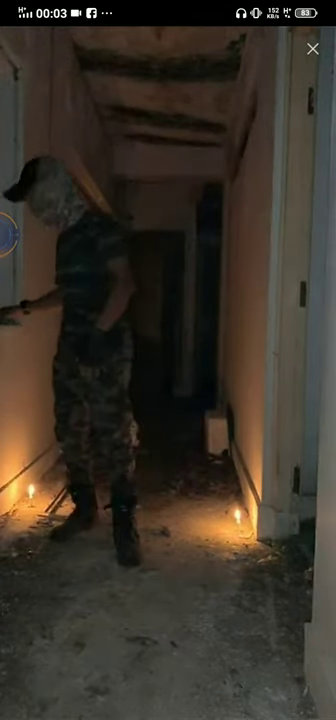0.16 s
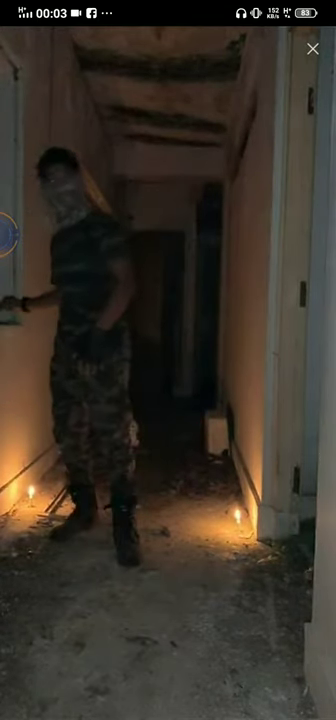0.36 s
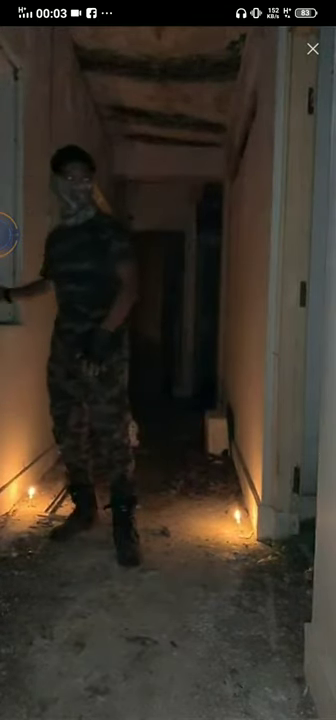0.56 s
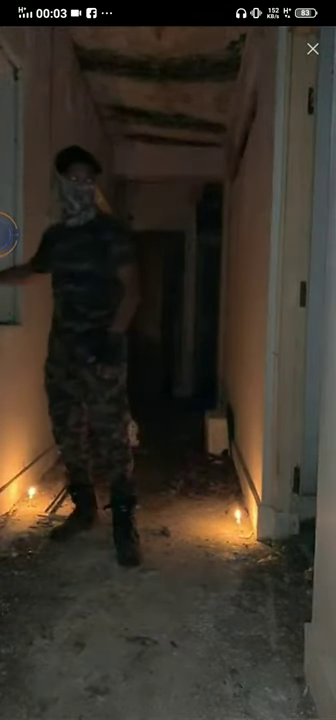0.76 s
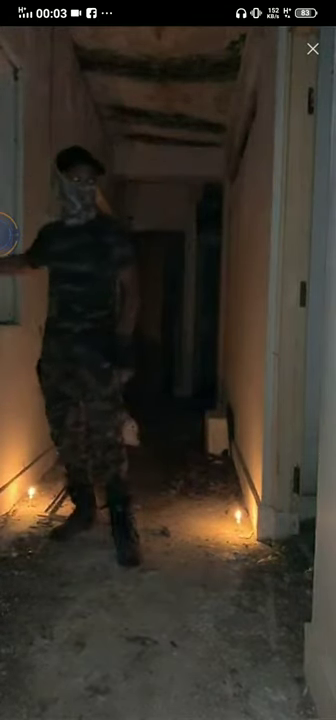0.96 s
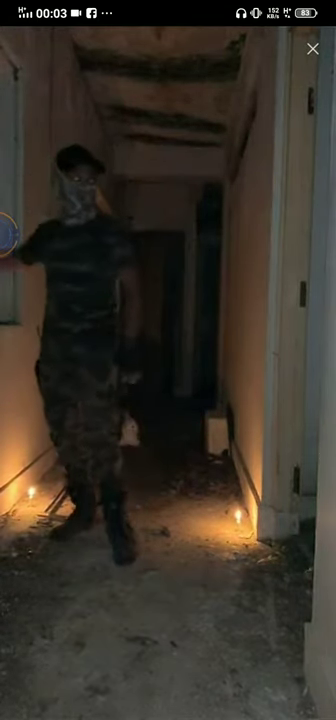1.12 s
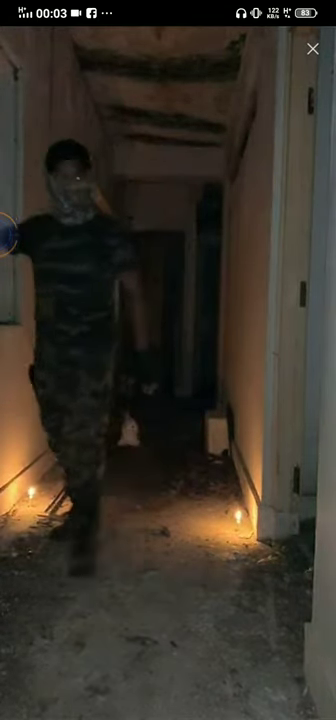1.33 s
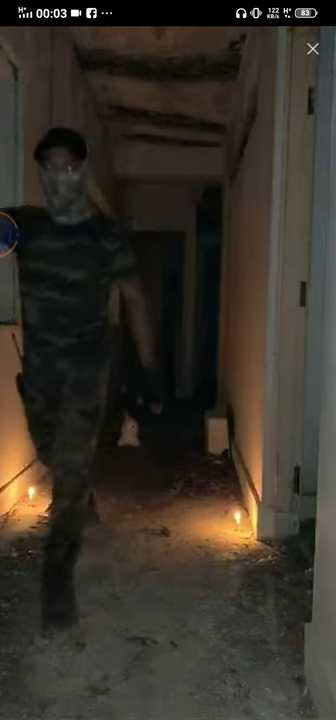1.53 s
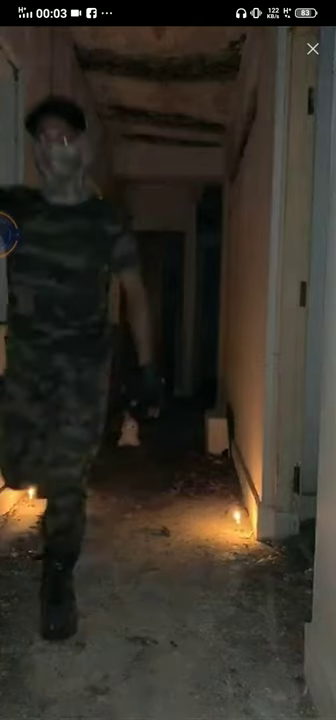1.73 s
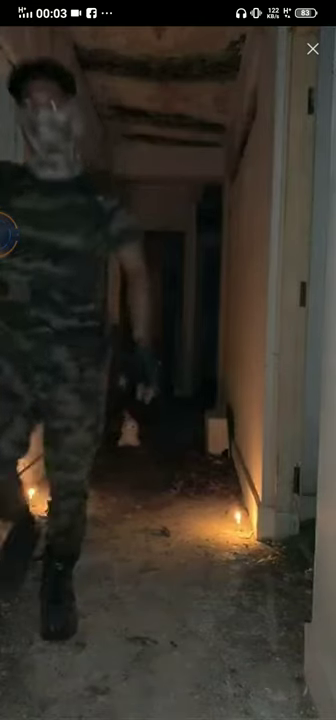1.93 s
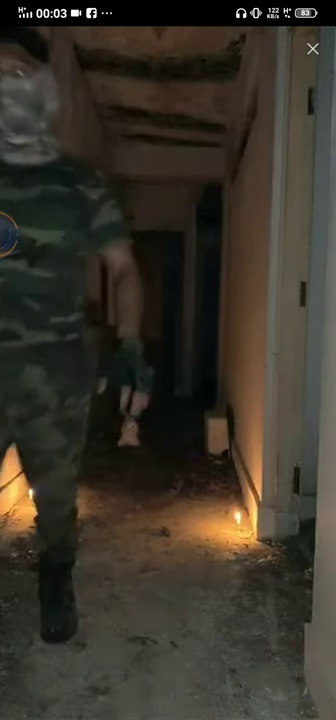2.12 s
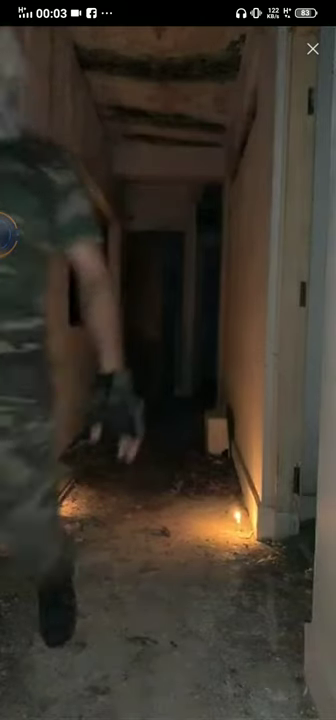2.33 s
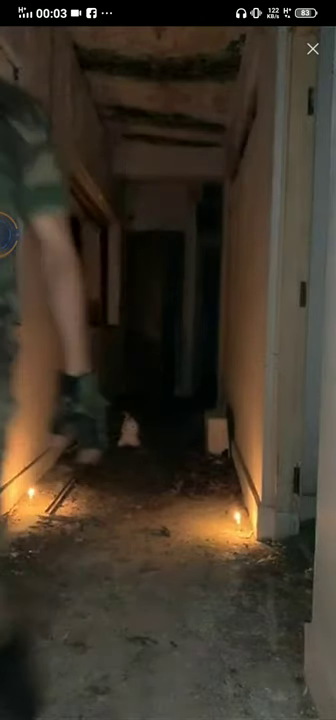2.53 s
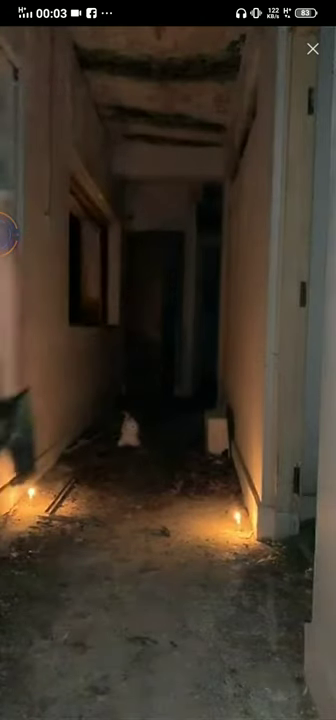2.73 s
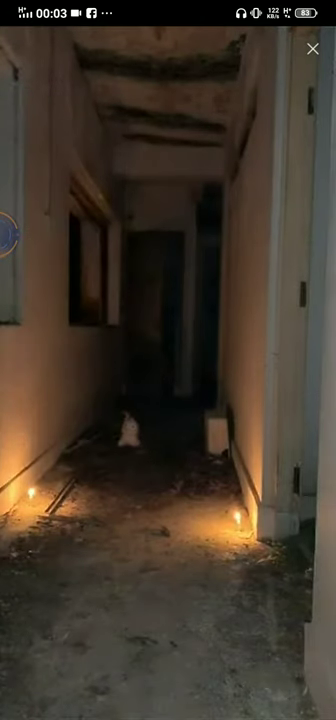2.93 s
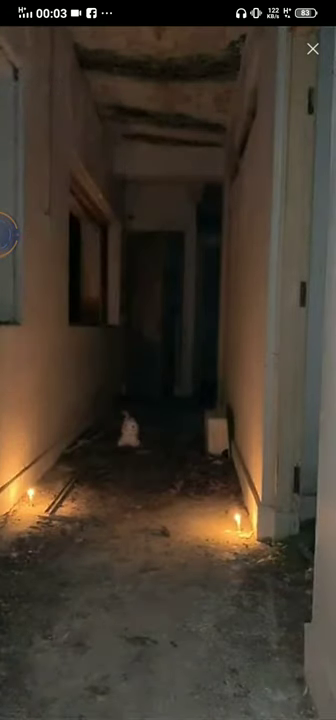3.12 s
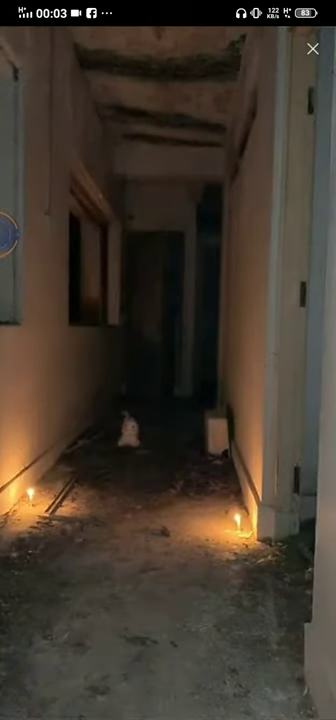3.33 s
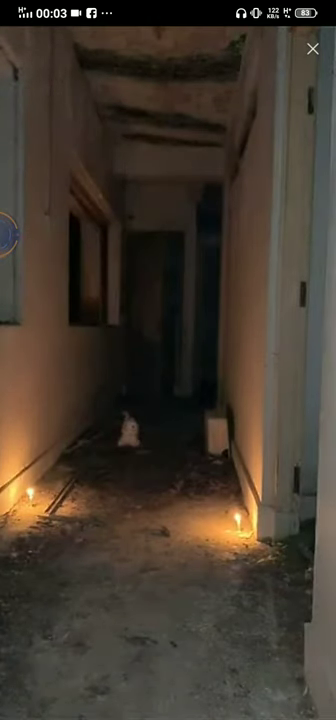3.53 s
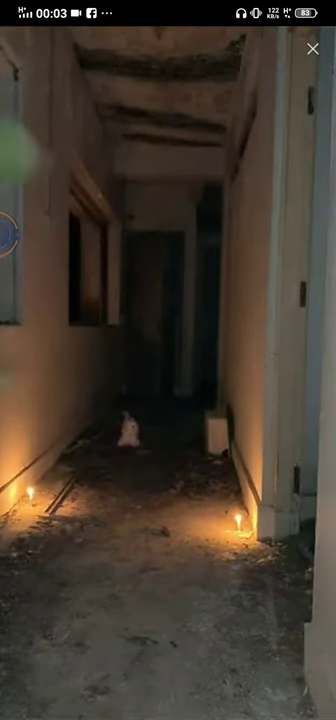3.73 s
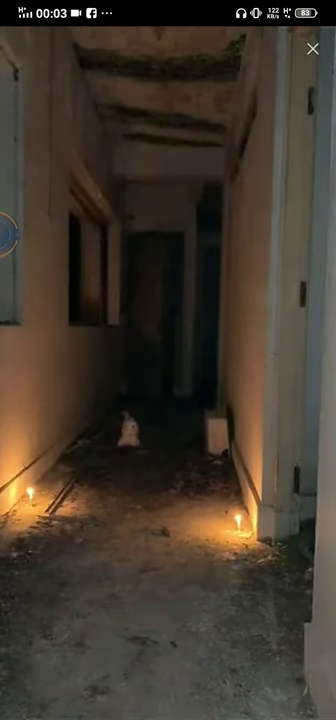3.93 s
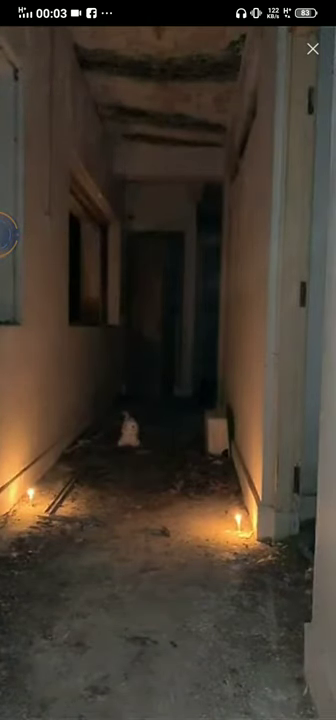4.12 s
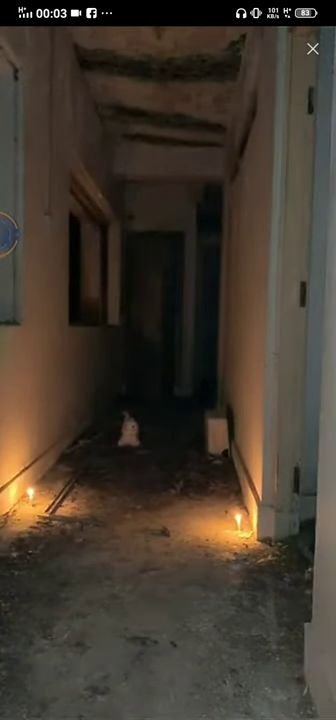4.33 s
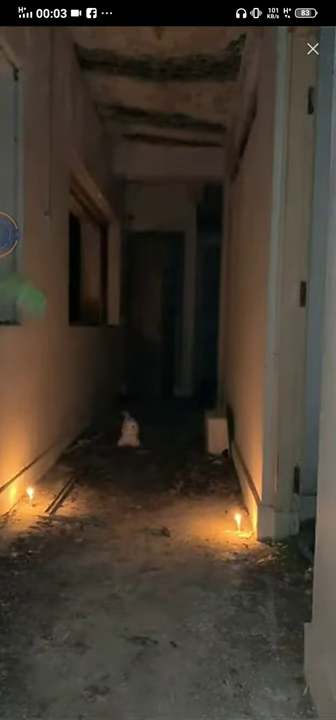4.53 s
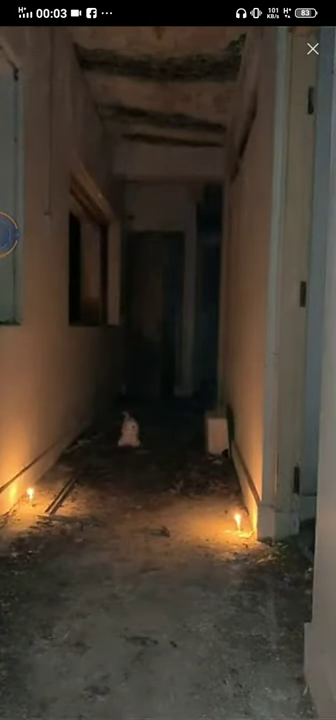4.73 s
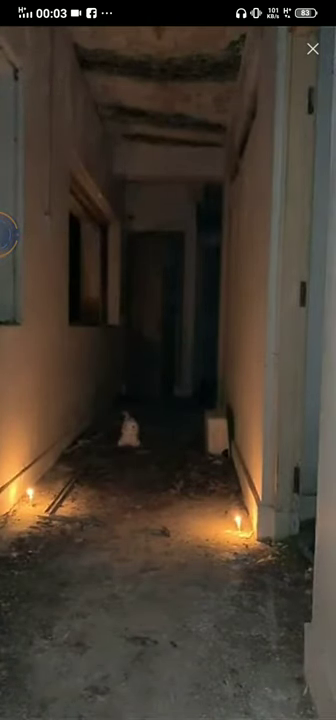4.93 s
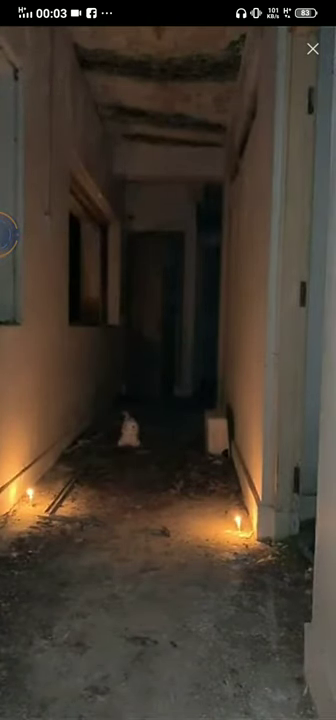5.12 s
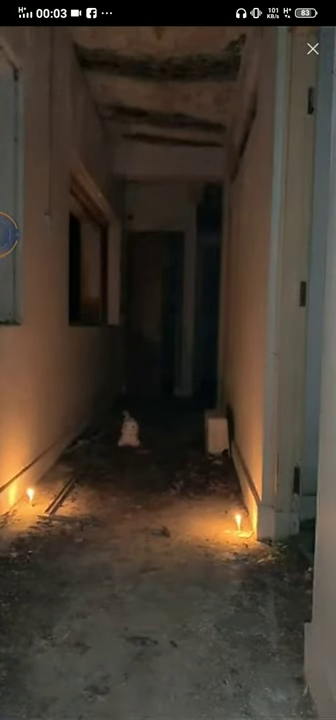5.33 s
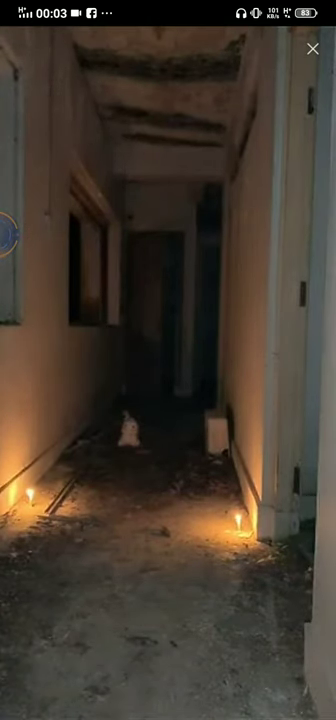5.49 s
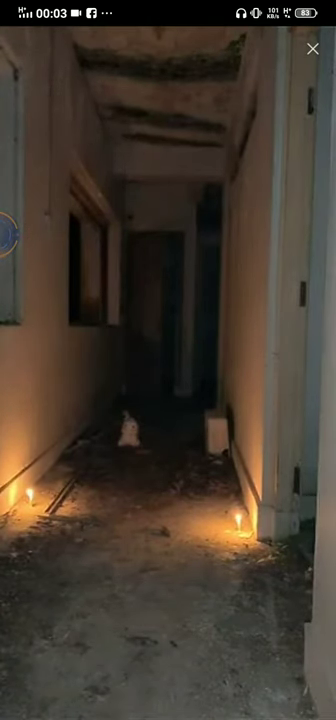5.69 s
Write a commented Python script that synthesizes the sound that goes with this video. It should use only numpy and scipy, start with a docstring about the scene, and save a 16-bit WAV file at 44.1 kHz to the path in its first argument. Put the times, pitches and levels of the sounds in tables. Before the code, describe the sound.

A phone microphone stands in a bare concrete corridor of an abandoned building at night. A rough low hum like a distant motor opens, sinking away between 0.4 and 1 s; quiet air, soft draught rumble and a very faint high insect chirr continue. Boots crunch on grit at about 0.6, 1.1, 1.3, 1.6 and 1.9 s, crisp and small, with short wall reverberation. A faint unsteady far tone swells near 1.9 s. From 2 s soles slide over sand, with a firm low landing near 2.6 s. At 3.1-3.3 s a hard scrape snaps and kicks several stones. A sharp stone click and the heaviest dull thuds come around 3.8-3.9 s, then long gritty drags to about 4.7 s, with a bright crunch at 4.5. Two or three crunches with small stones fall near 4.9 s; faint ticks and trouser rustle follow, fading into quiet by 6 s.

```python
"""Gritty boots in a night corridor

A walker's boots crunch down the bare concrete corridor of an empty building and pass a phone microphone.
Close by, the soles drag and turn: bursts of filtered grains make crunches and slides, ringing cracks make stones.
Landings are low resonant knocks, and decaying noise answers from the bare walls.
Behind are a low hum that sinks early, a far unsteady tone, brushing trousers, a draught and faint insects."""
import sys
import numpy as np
from scipy import signal
from scipy.fft import rfft, irfft, next_fast_len
from scipy.io import wavfile
from scipy.ndimage import uniform_filter1d, map_coordinates

SR = 44100
rng = np.random.default_rng(int(sys.argv[2]) if len(sys.argv) > 2 else 0)


def transcribe(u):
    """Save the signal u as a 16-bit wav file named by the first command-line argument.

    u: samples, shape (n,) or (channels, n), limited to [-1, 1]; the rate is SR.
    q: integer samples, one column per channel.
    """
    v = np.clip(np.atleast_2d(u).T, -1, 1)
    q = np.round(v * 32767).astype(np.int16)
    wavfile.write(sys.argv[1], SR, q)


N = 258143
TIME = np.arange(N) / SR

# All levels are those of the dry source, ahead of the corridor.
# still night air: hz, level_db
AIR_SPECTRUM = [(100, 18.5), (250, 2), (450, 1), (900, 0), (1800, -11), (3500, -19), (8000, -25.5),
                (12000, -17.5), (16000, -7)]
# draught on the microphone: hz, level_db
DRAUGHT_SPECTRUM = [(20, -7), (35, -17), (50, 9.5), (75, 0.5), (110, -10), (190, -22), (300, -49),
                    (600, -52)]
# puffs of air on the microphone: peak_s, level_db
PUFFS = [(.78, -58.5), (1.31, -52), (1.89, -53), (2.02, -55), (2.76, -53.5), (3.17, -56), (3.36, -52),
         (3.6, -55), (3.83, -48.5), (4.04, -45), (4.33, -50), (4.48, -46), (4.56, -45.5), (4.9, -56.5),
         (5.0, -54.5), (5.43, -61.5), (5.67, -56.5)]
PUFF_BUILD_S, PUFF_T60_S = 0.039, 0.28
DRAUGHT_DB, DRAUGHT_SWING_DB = -72, 1.5  # between the puffs
# loudness of the insects over time: time_s, level_db
INSECT_LEVELS = [(0, -82), (.15, -81.5), (.25, -86.5), (1.6, -82), (5.1, -88), (5.5, -77), (5.85, -80.5)]
# chirr of the insects: hz, level_db
INSECT_SPECTRUM = [(3500, -40.5), (5200, -13.5), (6050, 0), (6350, -2), (6850, 6), (7200, -18.5),
                   (8200, -10), (9000, -26), (16000, -42.5)]

# harmonics of the hum: multiple, level_db
HUM_HARMONICS = [(1, 10), (2, -14.5), (3, -34.5)]
# rough noise in the hum: hz, level_db
GROWL_SPECTRUM = [(40, -8.5), (80, -14), (125, 14.0), (190, 0.5), (280, -12), (400, -16.5),
                  (800, -29), (2000, -61.0)]
HUM_DB, HUM_UNTIL_S, HUM_T60_S, HUM_REST_DB = -58.5, 0.42, 0.74, -84.5  # holds, then sinks to a murmur
# swells of the far tone: peak_s, level_db
TONE_SWELLS = [(1.17, -80), (1.88, -69.5), (2.47, -74)]
TONE_BUILD_S, TONE_T60_S = 0.1, 0.62

# trouser legs brushing: peak_s, level_db
SWISHES = [(.35, -92), (.92, -84), (1.74, -73), (5.17, -79.5), (5.39, -73)]
# soft rustle of cloth: hz, level_db
CLOTH_SPECTRUM = [(1000, -17), (2500, -5), (4000, -3), (5500, -12), (7000, -0.5), (8400, 3.5),
                  (12000, -1.5), (16000, -14.5)]
SWISH_BUILD_S, SWISH_T60_S = 0.22, 0.93

# the boot's weight landing: start_s, level_db, rise_s, fade_t60_s, heel_over_sole_db
THUDS = [(0.739, -71, 0.026, 0.58, -20), (1.984, -73, 0.013, 0.11, 11), (2.578, -47.5, 0.0091, 0.17, 3),
         (2.654, -52.5, 0.043, 0.25, -7), (3.14, -65.5, .025, 0.55, -13), (3.452, -69.5, 0.035, 0.5, -7),
         (3.797, -51, 0.041, .22, 1.5), (3.872, -39.5, .0069, 0.13, -3), (3.98, -60, 0.019, 0.37, -4),
         (4.87, -72.5, 0.003, 0.17, 15)]
# low resonances of the corridor: hz, level_db
CORRIDOR_BOOM = [(60, 12.5), (200, -3.5), (260, -1), (310, -1), (375, -17.5), (470, 7), (600, -5)]
SOLE_HZ, HEEL_HZ = 211.6, 502.3  # the two resonances of a landing boot

# single stones snapping or kicked: start_s, level_db, ring_hz
STONES = [(1.3205, -22.5, 4650), (1.927, -33, 6700), (2.244, -41, 3900), (2.399, -37, 5130),
          (2.48, -37.5, 9680), (3.1592, -24.5, 9050), (3.2187, -29.5, 8600), (3.2222, -20.5, 7900),
          (3.2336, -19.5, 6240), (3.247, -15.5, 2140), (3.2489, -13, 1480), (3.261, -24, 1890),
          (3.300, -32, 1460), (3.8005, -14, 4460), (3.826, -25, 805), (4.289, -23, 1910),
          (4.298, -21, 2480), (4.8709, -29, 1810), (4.9062, -26.5, 3030)]
STONE_HZ, STONE_DB = 4000, -30  # a typical stone: pitch and level
STONE_T60_S, STONE_T60_EXPONENT = 0.0047, -0.59  # ring of the typical stone; lower stones ring longer
CRACK_DB, CRACK_DB_PER_OCTAVE, CRACK_DB_PER_DB = -9, 13, -0.94  # high, soft stones crack more than ring

# soles sliding: full_pressure_s, sand_db, build_s, hold_s, scrape_over_sand_db
SLIDES = [(1.934, -56, 0.015, .01, -11), (1.983, -40.5, 0.018, .003, -16), (2.045, -63, 0.033, .01, -17),
          (2.194, -58, 0.15, .015, -12.5), (2.3, -55.5, 0.084, .006, -7), (2.359, -53.5, 0.023, .008, -11),
          (2.414, -53.5, 0.018, 0.0069, -30), (2.493, -62, 0.045, 0.49, -2.5),
          (2.592, -45.5, 0.027, 0.0071, -2), (2.672, -45, 0.086, 0.01, -7.5),
          (2.972, -54, 0.033, .005, -7.5), (3.026, -53.5, .06, 0.0084, -8),
          (3.133, -41, 0.075, 0.098, -1.5), (3.264, -47, 0.067, 0.035, 3.5),
          (3.357, -49.5, 0.056, 0.013, -12.5), (3.445, -54, 0.13, 0.14, -3.5),
          (3.648, -48, 0.29, 0.11, -6.5), (3.793, -40, 0.074, 0.043, -3.5),
          (3.954, -45.5, 0.33, 0.092, -3.5), (4.174, -40, 0.27, 0.22, -7), (4.493, -45, 0.11, 0.059, -4.5),
          (4.624, -60, 0.076, .04, 5), (4.715, -49, 0.047, .012, -15)]
# hiss of fine sand: hz, level_db
SAND_SPECTRUM = [(400, -55), (1500, -7), (2800, 4), (4200, 3.5), (5500, 3), (6600, 0.5), (7600, 2),
                 (11000, 3), (12800, -1.5), (13600, -6.5), (16000, -13)]
# scrape of coarse grit: hz, level_db
SCRAPE_SPECTRUM = [(100, -24), (190, -25), (260, -35.5), (370, -28.5), (480, 0.5), (640, 0), (800, -0.5),
                   (1100, 2), (1500, 3.5), (2400, 2), (3100, -8.5), (6000, -27)]
SLIDE_T60_S = 0.23  # how fast a sliding sole comes to rest
BUILD_DB = 16.5  # climb of any stroke over its build-up time

# crunches under the sole:
# start_s, level_db, rise_s, fade_t60_s, lows_db, treble_db, chip_low_hz, chip_high_hz
STEPS = [(0.5578, -46.5, 0.0047, 0.079, -9, 3.5, 2080, 9770),
         (.566, -51, 0.0043, 0.18, -9, -6.5, 4030, 13100), (0.934, -66.5, 0.0038, .15, -31, -4, 3120, 3900),
         (1.092, -46, 0.0059, 0.085, -1.5, 0.5, 1350, 2200),
         (1.319, -35.5, 0.0056, 0.25, -11, -4, 1570, 3320), (1.583, -55, 0.0037, 0.15, -1.5, 7, 4500, 6900),
         (1.847, -47, 0.0017, 0.18, -0.5, -5, 2620, 8200), (1.970, -42.5, 0.0094, 0.069, 6, 1, 1760, 2430),
         (1.981, -42.5, 0.0011, 0.097, 6, 9, 2430, 4370), (2.494, -54, 0.0045, 0.099, 39, -18, 890, 1250),
         (2.574, -39.5, 0.0011, .076, 21, -1, 2230, 3300),
         (3.0883, -40, 0.0034, 0.17, -5, 2.5, 4030, 11000), (3.250, -37.5, 0.007, .11, 29, -18, 1410, 2400),
         (4.541, -38, 0.0026, 0.11, -11, 3, 12000, 14700), (4.857, -49, 0.0018, 0.15, 1, 4, 1630, 9800),
         (4.872, -47.5, .003, 0.31, 13, -1, 780, 1734), (4.907, -46, .0011, 0.1, 5, -22, 2670, 4020),
         (4.971, -55.5, .004, 0.12, -3, -5, 1825, 2680), (5.277, -68, .0008, 0.15, -10, 30, 9000, 13200),
         (5.421, -60, 0.0049, 0.15, -2.5, 7, 2500, 3180),
         (5.672, -70.5, 0.0018, 0.14, -11.5, 14, 8900, 11030)]
# crushed grit: hz, level_db
CRUNCH_SPECTRUM = [(150, -43.5), (400, -19), (900, -11.5), (1450, -6.5), (1800, -4.5), (2200, -4.5),
                   (2650, -4), (3300, -3), (4400, -3.5), (6200, -9), (7400, -4.5), (9500, -3.5),
                   (12900, -12), (13700, -21)]
# rubber settling on concrete: hz, level_db
RUBBER_SPECTRUM = [(150, -19.5), (350, -21.5), (550, 2), (850, 1.5), (1300, -2), (2200, -8.5), (4000, -7),
                   (8000, -32.5)]
# chip ring at this fade; a longer crunch breaks more chips and rings less
CHIP_RING_DB, CHIP_T60_S = 10, 0.1

# fading of the sound between bare walls: hz, t60_s
WALL_T60 = [(100, 0.051), (800, 0.52), (3000, 0.4), (7000, 0.53), (10000, 0.29), (15000, 0.48)]
PHONE_TOP_HZ = 15850


def amp(db):
    """Decibels to gain."""
    return 10 ** (np.asarray(db) / 20)


def unit(x):
    """Scale to rms 1."""
    return x / np.sqrt(np.mean(x ** 2) + 1e-20)


def along(points, hz):
    """Read (hz, value) points on a log frequency axis."""
    f, v = np.transpose(points)
    return np.interp(np.log(hz + 1), np.log(f + 1), v)


def wobble(rate):
    """A smooth random curve with rate knots a second."""
    knots = rng.standard_normal(int(N * rate / SR) + 4)
    return map_coordinates(knots, [TIME * rate])


def colour(x, level_of):
    """Causal minimum-phase filter whose level in dB is a function of frequency."""
    m = 2 * next_fast_len(len(x) // 2 + 4096)
    gain = amp(level_of(np.fft.rfftfreq(m, 1 / SR)))
    cepstrum = irfft(np.log(gain + 1e-6))
    # folding the cepstrum forward in time makes the filter causal
    cepstrum[1:m // 2] *= 2
    cepstrum[m // 2 + 1:] = 0
    return irfft(rfft(x, m) * np.exp(rfft(cepstrum)))[:len(x)]


def coloured(x, spectrum):
    """Filter by a spectrum table and scale to rms 1."""
    return unit(colour(x, lambda hz: along(spectrum, hz)))


def noise(spectrum, count=N):
    """Coloured noise of rms 1."""
    return coloured(rng.standard_normal(count), spectrum)


def grit(count, rate, spread_db):
    """Sand grains cracking at random instants, rate a second, most small and a few large."""
    chance, sizes = rng.random(count), rng.standard_normal(count)
    signs = rng.choice([-1, 1], count)
    return unit((chance < rate / SR) * signs * amp(spread_db * np.minimum(sizes, 2)))


def chips(rate, centre_hz, spread_octaves, cycles, spread_db, count=4000):
    """Scattered ticks of larger grains, each a few cycles at its own pitch."""
    t, draws = TIME[:SR // 200], rng.standard_normal((count, 2))
    starts = np.cumsum(rng.exponential(SR / rate, count)).astype(int)
    pitch = np.clip(centre_hz * 2 ** (spread_octaves * draws[:, :1]), 900, 14000)
    size = amp(spread_db * np.minimum(draws[:, 1:], 2))
    ticks = size * np.sin(2 * np.pi * pitch * t) * np.exp(-pitch * t / cycles)
    places = starts[:, None] + np.arange(len(t))
    return unit(np.bincount(places.ravel(), ticks.ravel(), N)[:N])


def patchy(x, depth_db):
    """The colour drifts as the sole meets new patches of floor; rms 1."""
    z = signal.stft(x, nperseg=512)[2]
    field = rng.standard_normal(z.shape)
    for _ in range(2):
        field = uniform_filter1d(field, size=7, axis=0)
        field = uniform_filter1d(field, size=7, axis=1)
    return unit(signal.istft(z * amp(depth_db * unit(field)), nperseg=512)[1][:N])


def swell(t, rise, t60):
    """Pressure builds for the rise time, then dies away."""
    return np.minimum(t / max(rise, 1e-4), 1) * amp(-60 * np.maximum(t - rise, 0) / t60)


def stroke(s, build, hold, t60):
    """A gain that climbs to 1 at time s, holds, then dies away."""
    early = np.maximum(s - TIME, 0)
    late = np.maximum(TIME - s - hold, 0)
    return amp(np.maximum(-BUILD_DB * early / build - 60 * late / t60, -120))


def surges(rows, build, t60):
    """The joint gain of (peak_s, level_db) swells that share one shape."""
    return np.sqrt(sum((amp(db) * stroke(s, build, 0, t60)) ** 2 for s, db in rows))


def add(track, s, sound):
    """Mix a sound in at time s."""
    room_left = track[max(round(s * SR), 0):][:len(sound)]
    room_left += sound[:len(room_left)]


def night(air_db=-78):
    """Still air, low draught noise on the microphone and a thin flickering chirr of insects."""
    insect_level = amp(np.interp(TIME, *np.transpose(INSECT_LEVELS)))
    insects = insect_level * noise(INSECT_SPECTRUM) * amp(1.5 * wobble(22))
    steady = amp(DRAUGHT_DB + DRAUGHT_SWING_DB * wobble(11))
    draught = np.hypot(steady, surges(PUFFS, PUFF_BUILD_S, PUFF_T60_S))
    return amp(air_db) * noise(AIR_SPECTRUM) + draught * noise(DRAUGHT_SPECTRUM) + insects


def hum(pitch_hz=100.8, waver=0.013, rough_db=-9):
    """Wavering harmonics and low noise make a rough hum, like a motor outside."""
    phase = 2 * np.pi * np.cumsum(pitch_hz * (1 + waver * wobble(40))) / SR
    tone = sum(amp(db) * np.sin(round(k) * phase) * amp(3.3 * wobble(27)) for k, db in HUM_HARMONICS)
    fade_db = -60 * np.maximum(TIME - HUM_UNTIL_S, 0) / HUM_T60_S
    level = amp(HUM_DB + fade_db) + amp(HUM_REST_DB)
    return level * (unit(tone) + amp(rough_db) * noise(GROWL_SPECTRUM))


def far_tone(pitch_hz=382, waver=0.0193):
    """A thin tone from far away, slightly unsteady in pitch and level, swells and fades."""
    phase = 2 * np.pi * np.cumsum(pitch_hz * (1 + waver * wobble(26))) / SR
    tone = unit(np.sin(phase) * amp(1.8 * wobble(25)))
    return surges(TONE_SWELLS, TONE_BUILD_S, TONE_T60_S) * tone


def cloth(rest_db=-93):
    """Trousers brush softly as the legs move: swells of fluttering noise."""
    level = amp(rest_db) + surges(SWISHES, SWISH_BUILD_S, SWISH_T60_S)
    return level * noise(CLOTH_SPECTRUM) * amp(1.8 * wobble(30))


def thuds(sharpness=2.8):
    """Heel and sole flex under the weight: a dull knock, coloured by the corridor."""
    out, t = np.zeros(N), TIME[:SR // 2]
    for s, db, rise, t60, heel_db in THUDS:
        push = swell(t, rise, t60)
        push_rms = np.sqrt(np.mean(push ** 2))
        for pitch_hz, part_db in ((SOLE_HZ, 0), (HEEL_HZ, heel_db)):
            def body(hz):
                detune = (hz + 1) / pitch_hz - pitch_hz / (hz + 1)
                return along(CORRIDOR_BOOM, hz) - 20 * np.log10(1 + (sharpness / 2 * detune) ** 2)

            knock = unit(colour(rng.standard_normal(len(t)), body) * push)
            add(out, s, amp(db + part_db) * knock * push_rms)
    return out


def stones(crack_t60=0.016, overtone=1.62, overtone_db=-9, lowest=0.76,
           crumble_db=-19, crumble_t60=0.055):
    """A stone cracks, rings for a few cycles and sheds crumbs."""
    out, t = np.zeros(N), TIME[:SR // 10]
    for s, db, ring_hz in STONES:
        t60 = STONE_T60_S * (ring_hz / STONE_HZ) ** STONE_T60_EXPONENT
        crack_db = CRACK_DB + CRACK_DB_PER_OCTAVE * np.log2(ring_hz / STONE_HZ)
        crack_db += CRACK_DB_PER_DB * (db - STONE_DB)
        phase = 2 * np.pi * ring_hz * t
        ring = np.sin(phase) + amp(overtone_db) * np.sin(overtone * phase)
        ring *= amp(-60 * t / t60)
        crack = noise(SAND_SPECTRUM, len(t)) * amp(-60 * t / crack_t60)
        # crumbs sound duller or brighter with the stone they fall from
        crumbs = colour(grit(len(t), rate=3200, spread_db=-5.0),
                        lambda hz: -12 * np.abs(np.log2((hz + 1) / ring_hz)))
        crumble = amp(crumble_db) * unit(crumbs) * swell(t, 0.0021, crumble_t60)
        # a small stone radiates little below its own pitch
        snap = colour(ring + amp(crack_db) * crack + crumble,
                      lambda hz: -10 * np.log10(1 + (lowest * ring_hz / (hz + 100)) ** 6))
        add(out, s, amp(db) * snap / (1 + amp(crack_db)))
    return out


def shuffle(catch_db=1.5, chips_db=-11):
    """A dragged sole rolls fine sand and coarser grit, catching and slipping as it goes."""
    power = np.zeros((2, N))
    for s, db, build, hold, coarse_db in SLIDES:
        levels = amp([[db], [db + coarse_db]])
        power += (levels * stroke(s, build, hold, SLIDE_T60_S)) ** 2
    sand_level, scrape_level = np.sqrt(power)
    catch = amp(catch_db * wobble(70))
    fine = coloured(grit(N, rate=12000, spread_db=4.2), SAND_SPECTRUM)
    coarse = coloured(grit(N, rate=7000, spread_db=3), SCRAPE_SPECTRUM)
    ticks = chips(rate=260, centre_hz=4500, spread_octaves=0.8, cycles=1.1, spread_db=4.5)
    rolling = patchy(fine, depth_db=2.0) + amp(chips_db) * ticks
    return catch * (sand_level * rolling + scrape_level * patchy(coarse, depth_db=1.94))


def steps(ring_octaves=0.14, uneven_db=2.0, contact_db=2, contact_t60=0.0053,
          settle_db=-22, settle_rise=0.0247, settle_t60=0.25):
    """Each step crushes a burst of grains; the chip under the sole lends it a ring."""
    out, t = np.zeros(N), TIME[:SR // 3]
    for s, db, rise, t60, lows_db, treble_db, low_hz, high_hz in STEPS:
        tilt = [(1200, lows_db), (3200, 0), (9500, treble_db)]
        # every patch of debris has small resonances of its own
        patch = np.transpose([np.geomspace(900, 16000, 44), uneven_db * rng.standard_normal(44)])

        def debris(hz):
            peaks = sum(np.exp(-0.5 * (np.log2((hz + 1) / f) / ring_octaves) ** 2)
                        for f in (low_hz, high_hz))
            ring = CHIP_RING_DB * CHIP_T60_S / t60 * peaks
            return along(CRUNCH_SPECTRUM, hz) + along(tilt, hz) + ring + along(patch, hz)

        grains = unit(colour(grit(len(t), rate=9000, spread_db=3.5), debris))
        # first contact adds a very short burst
        crush = swell(t, rise, t60) * (1 + amp(contact_db - 60 * t / contact_t60))
        # the sole settles a moment later with a duller scrape
        rubber = noise(RUBBER_SPECTRUM, len(t))
        settle = amp(settle_db + min(lows_db, 6)) * rubber * swell(t, settle_rise, settle_t60)
        add(out, s, amp(db) * (grains * crush + settle))
    return out


def corridor(x, wet_db, build_up=0.0053):
    """Direct sound plus the dense answer of bare walls, weighted for equal total power."""
    hz, _, z = signal.stft(rng.standard_normal(SR * 2 // 3), SR, nperseg=256)
    t = _
    fade = amp(-60 * t / along(WALL_T60, hz)[:, None])
    tail = signal.istft(z * fade, SR, nperseg=256)[1]
    tail *= 1 - np.exp(-TIME[:len(tail)] / build_up)
    answer = signal.fftconvolve(x, tail / np.linalg.norm(tail))[:N]
    return (x + amp(wet_db) * answer) / np.hypot(1, amp(wet_db))


def scene():
    """Steps down the corridor are wetter than the shuffling beside the microphone."""
    background = night() + hum() + far_tone() + cloth()
    landings = corridor(thuds(), wet_db=-5)
    debris = corridor(stones(), wet_db=-14)
    soles = corridor(shuffle(), wet_db=-9.5) + corridor(steps(), wet_db=-5.5)
    return (background + landings + debris + soles)[None]


def record(dry):
    """The phone keeps nothing above its band limit."""
    m = next_fast_len(N + SR // 2)
    kept = np.fft.rfftfreq(m, 1 / SR) < PHONE_TOP_HZ
    return irfft(rfft(dry, m) * kept, m)[..., :N]


dry = scene()
out = record(dry)
transcribe(out)
```